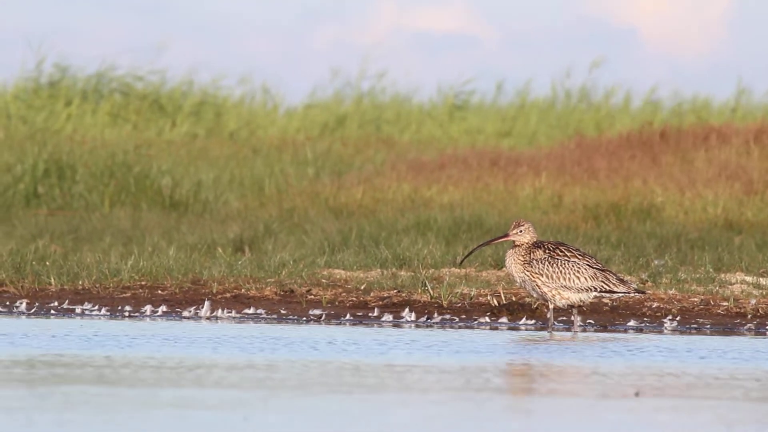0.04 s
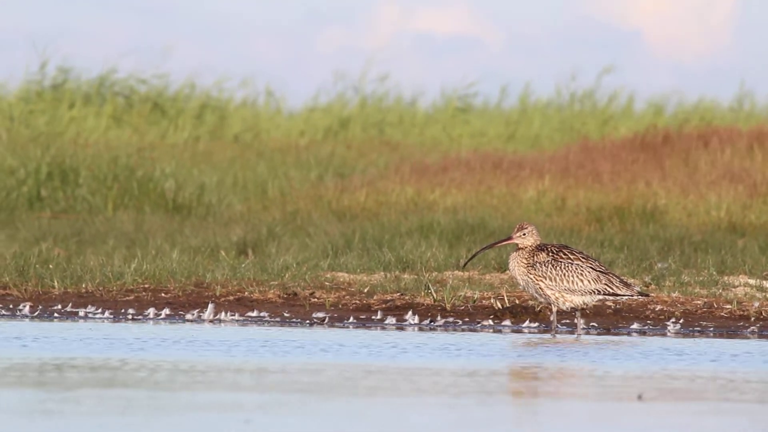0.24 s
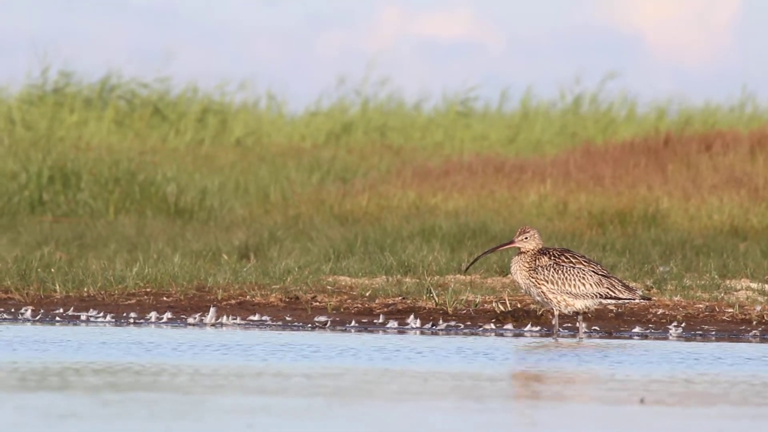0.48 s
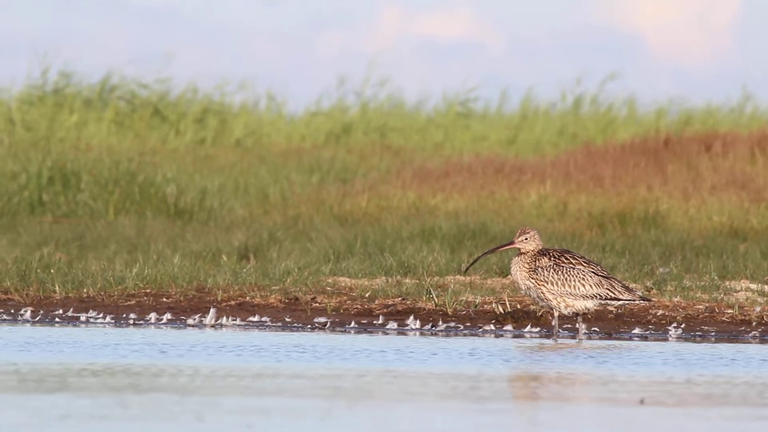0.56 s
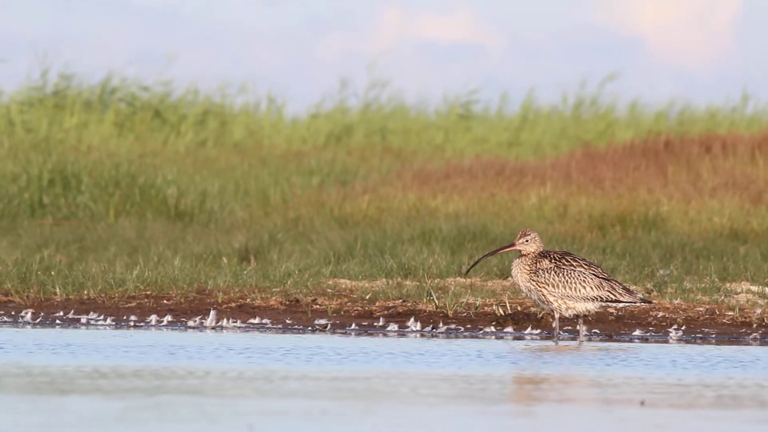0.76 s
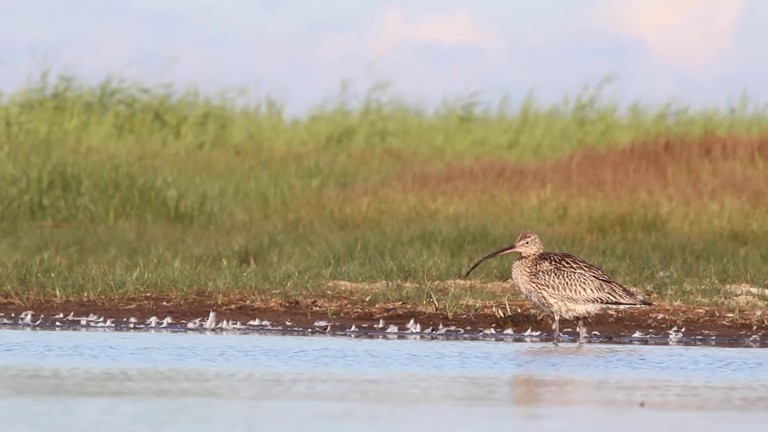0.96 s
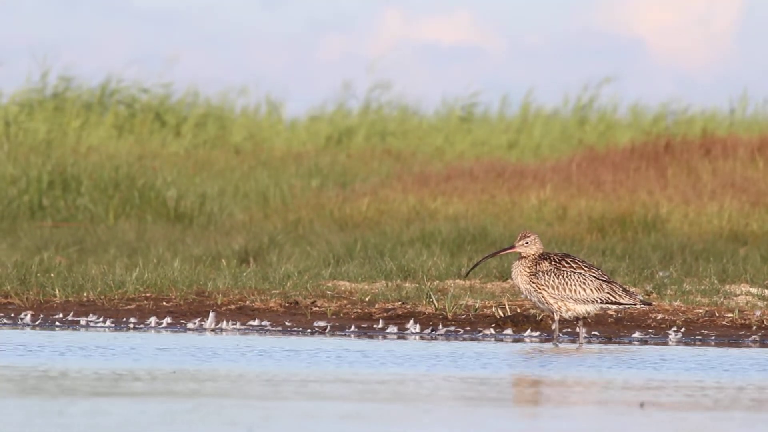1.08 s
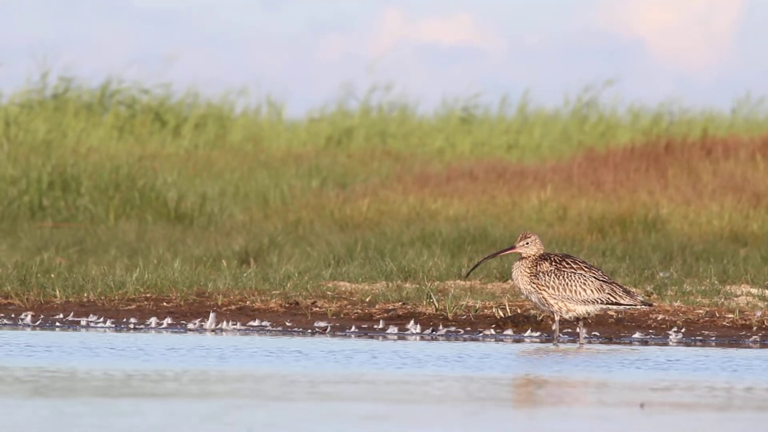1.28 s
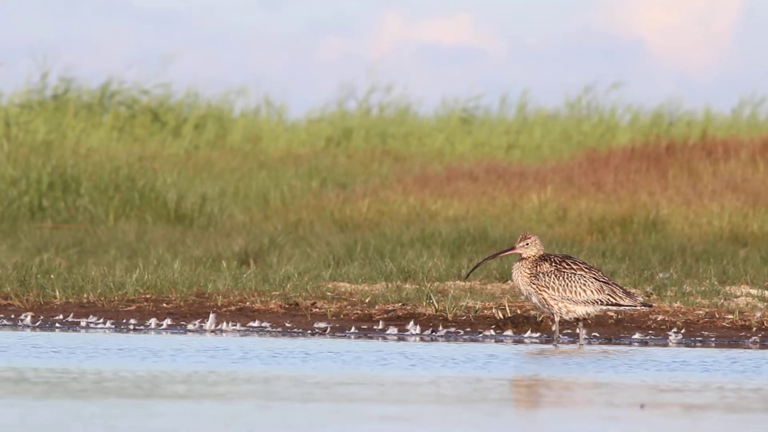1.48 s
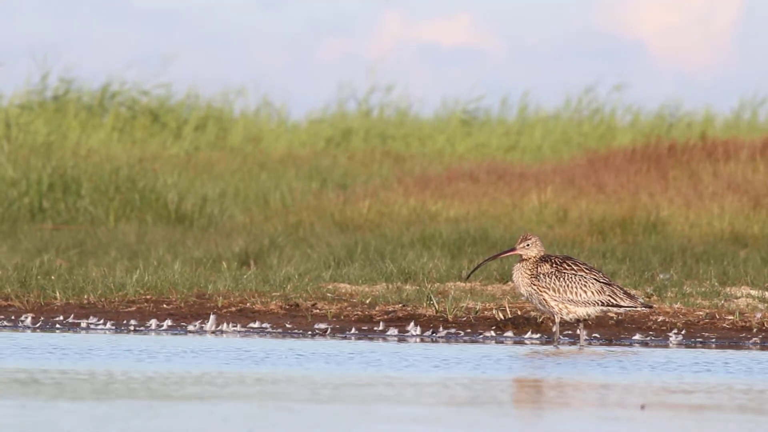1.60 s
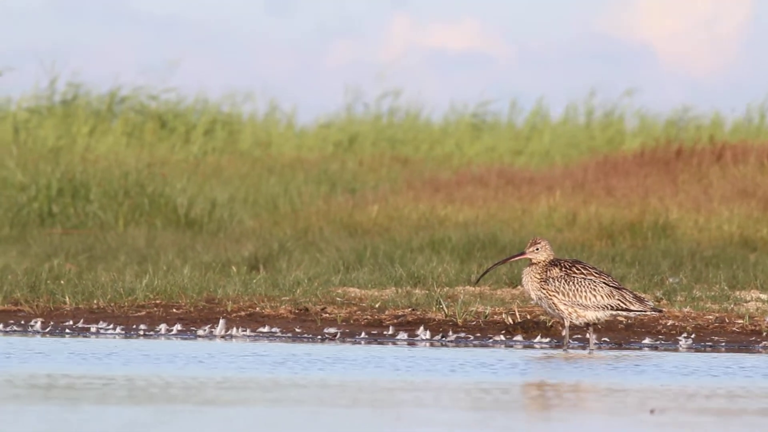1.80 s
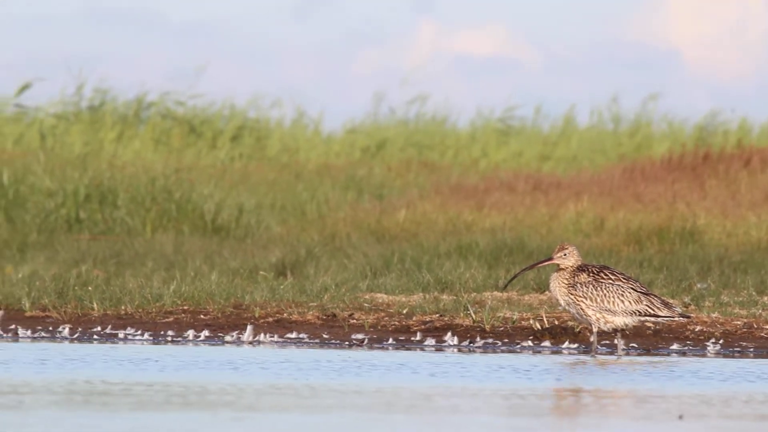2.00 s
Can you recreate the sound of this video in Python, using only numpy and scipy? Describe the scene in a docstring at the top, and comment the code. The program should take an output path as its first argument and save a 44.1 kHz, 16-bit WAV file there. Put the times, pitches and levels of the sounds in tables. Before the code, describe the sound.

A wading bird whistles outdoors, starting with the tail of a high, slightly rough note. A sharp camera click follows just before 0.1 seconds. At 0.9 seconds a clear whistle leaps up and slides down, followed by two short level pips at about 1.1 and 1.25. Low gusts bump the microphone throughout over a thin hiss. From 1.7 to 2 seconds come a soft rustle and faint handling ticks.

```python
"""A wading bird whistles on a marsh shore: the end of one note, then a falling note and two level pips.
Its voice is a nearly pure vibration, a little rough at times, shaped by its throat and bill.
Gusts bump the microphone over a low murmur of wind, a thin hiss and a soft rustle.
A handled camera gives one sharp snap, which briefly turns all the sound down, and later faint ticks."""
import sys
import numpy as np
from scipy import signal
from scipy.fft import rfft, irfft
from scipy.io import wavfile
from scipy.ndimage import uniform_filter1d

SR = 44100
rng = np.random.default_rng(int(sys.argv[2]) if len(sys.argv) > 2 else 0)


def output_pcm(signal):
    """Save a mono or channel-first signal as 16-bit PCM at the path in sys.argv[1].

    Samples are clipped to [-1, 1] before scaling.
    """
    pcm = np.clip(np.atleast_2d(signal).T, -1, 1) * 32767
    wavfile.write(sys.argv[1], SR, np.round(pcm).astype(np.int16))


N = 90404

# Short, level notes. Effort is the strength of the voice before the throat shapes it.
# start_s, length_s, pitch_hz, effort_db, roughness (0 to 1), flutter_db
PIP_NOTES = [(-.040, 0.07, 2366, -36.5, 0.42, -16), (1.085, 0.074, 2277, -32, .02, -22.5),
             (1.24, 0.071, 2348, -34, 0.3, -17)]
# Path of the falling note: time_s, pitch_hz, effort_db, overtone_boost_db
SLUR_PATH = [(.911, 1340, -53, 9), (0.913, 1426, -38, 13), (0.917, 1850, -39, 18.5),
             (0.9212, 2440, -39.5, 22), (0.9226, 3224, -30.5, 10.5), (.930, 3215, -25.5, 6.5),
             (0.935, 3145, -24.5, -2), (.948, 2550, -29.5, 6), (0.958, 2453, -29.5, 0),
             (.972, 2340, -31.5, -1), (1.000, 2290, -30, -5), (1.014, 2276, -33, -8), (1.02, 2210, -43, -5),
             (1.024, 1663, -34.5, -2), (1.037, 1400, -43, 1)]
# Strength of the voice's second and third harmonics: gain_db
HARMONIC_GAINS = [-15, -16.5]
# How the throat and bill favour some pitches: frequency_hz, gain_db
THROAT_SHAPE = [(800, -44), (1450, -14.5), (1700, -9), (2230, 0.5), (3200, -2), (3800, -10), (4500, -11),
                (5300, -15), (6400, -10.5), (6800, -24), (10000, -41)]
# Tone colour of the rasp in a rough note: frequency_hz, gain_db
RASP_SHAPE = [(1400, -23), (1650, -2), (2300, 0), (2650, -15), (3200, -11), (4200, -25), (7000, -37)]

# Gusts hitting the microphone: peak_s, half_width_s, level_db
WIND_GUSTS = [(.01, 0.031, -36.5), (0.461, 0.064, -46.5), (.70, 0.086, -43), (0.766, 0.022, -34.5),
              (0.882, 0.021, -40), (1.016, 0.016, -45.5), (1.12, 0.072, -51.5), (1.302, 0.012, -42),
              (1.469, .018, -32), (1.53, 0.029, -43), (1.602, 0.015, -37), (1.648, 0.013, -36.5),
              (1.757, 0.027, -36), (1.83, 0.044, -40.5), (1.98, 0.047, -43.5)]
# Deep rumble of a gust: frequency_hz, gain_db
RUMBLE_SHAPE = [(10, -8), (25, 1.5), (45, 1.5), (75, 1.5), (115, -1), (160, -11), (260, -28.5), (450, -44),
                (1000, -66), (3000, -90)]
# Higher rumble that strong gusts bring out: frequency_hz, gain_db
UPPER_RUMBLE_SHAPE = [(40, -30), (90, -23.5), (130, 2), (190, -0.5), (260, -9.5), (450, -23.5), (1000, -38),
                      (3000, -78)]
# Steady hiss of the air: frequency_hz, gain_db
HISS_SHAPE = [(100, -23), (250, -10.5), (420, -6), (480, -6), (580, -3), (700, -6.5), (850, -16),
              (1000, -17.5), (1500, -16), (2200, -20), (3900, -22), (9000, -30), (16000, -30.5)]
# Hollow tones in the wind's murmur: pitch_hz, width_hz, level_db
MURMUR_BANDS = [(335, 8.3, -67.5), (393, 20, -67), (586, 46, -56), (647, 17, -61.5)]
# How the rustle fades and swells: time_s, level_db
RUSTLE_LEVELS = [(0, -51), (.15, -62), (1.3, -72), (1.62, -77), (1.72, -39), (1.83, -48), (1.88, -49.5),
                 (1.95, -46), (2.05, -59.5)]
# Tone colour of the rustle: frequency_hz, gain_db
RUSTLE_SHAPE = [(100, 13), (220, 5.5), (400, 7.5), (700, 5.5), (1000, -14), (1600, -6.5), (2600, -12.5),
                (4000, -31), (9000, -30)]

# Tones the camera rings with when it snaps: pitch_hz, gain_db, fade_s (time to fall by 60 dB)
SNAP_TONES = [(560, -20.5, 0.012), (886, -10, 0.02), (1139, -18, 0.029), (1320, -26, 0.017),
              (1523, -9.5, 0.016), (1880, -8, 0.01), (2423, -7, 0.012), (2880, -21, 0.02),
              (3360, -13, 0.0049), (4180, -23.5, 0.017), (4660, -16, 0.009), (5930, -18, 0.0051),
              (7080, -21, 0.01), (8100, -20.5, 0.0058), (9370, -27.5, 0.0089), (11070, -12, 0.0035),
              (15500, -17.5, .004)]
# Rattle after the snap: frequency_hz, gain_db
RATTLE_SHAPE = [(100, -37), (500, -15), (900, -4), (2400, -10), (3500, -17), (5000, -25), (10000, -38),
                (16000, -40)]
# Faint ticks from handling the camera: start_s, gain_db
TICK_HITS = [(1.6734, -48.5), (1.7755, -50), (1.7965, -59), (1.832, -48.5), (1.844, -51), (1.948, -33)]
# Tones each tick rings with: pitch_hz, gain_db, fade_s (time to fall by 60 dB)
TICK_TONES = [(1222, -7, 0.084), (1500, 1, 0.017), (1750, 1, 0.025), (2250, 1.5, 0.015), (2670, -7, .012)]


def amp(db):
    """Turns decibels into a number to multiply by."""
    return 10 ** (np.asarray(db) / 20)


def unit(x):
    """Scales a signal to an average strength (rms) of 1."""
    return x / np.sqrt(np.mean(x ** 2) + 1e-20)


def gain_at(shape, hz):
    """Looks up a shape table at hz and gives a number to multiply by."""
    table_hz, db = np.transpose(shape)
    return amp(np.interp(np.log(hz + 1), np.log(table_hz + 1), db))


def filtered_noise(gain, size):
    """Noise of strength 1, with each frequency weighted by the function gain."""
    hz = np.fft.rfftfreq(size, 1 / SR)
    return unit(irfft(rfft(rng.standard_normal(size)) * gain(hz), size))


def noise(shape, size):
    """Noise with the tone colour of a shape table."""
    return filtered_noise(lambda hz: gain_at(shape, hz), size)


def wobble(size, rate_hz=248):
    """A random waver, mostly slower than rate_hz."""
    return filtered_noise(lambda hz: 1 / (1 + (hz / rate_hz) ** 4), size)


def add(mix, start_s, sound):
    """Mixes a sound in at start_s, dropping what falls outside the mix."""
    at = round(start_s * SR)
    sound = sound[max(-at, 0):]
    part = mix[max(at, 0):][:len(sound)]
    part += sound[:len(part)]


def whistle(hz, effort_db, bright_db, rough, flutter_db):
    """The bird's voice: a nearly pure vibration with some rasp, shaped by the throat and bill."""
    flutter_hz, catches_per_s, catch_s = 745, 380 * rough, 0.0016
    size = len(hz)
    t = np.arange(size) / SR
    phase = 2 * np.pi * np.cumsum(hz * (1 + 0.03 * rough * wobble(size))) / SR
    # A second, slower vibration adds a tone on each side of the pitch.
    flutter = 2 * np.pi * np.cumsum(flutter_hz * (1 + 0.02 * wobble(size))) / SR
    side_tones = amp(flutter_db) * (np.sin(phase - flutter) + 0.72 * np.sin(phase + flutter))
    # Each brief catch in the voice dips the tone and spits a puff of rasp.
    catch_times = t[rng.random(size) < catches_per_s / SR]
    catches = sum(np.exp(-((t - s) / catch_s) ** 2) for s in catch_times)
    tone = np.sin(phase) * (1 + 0.5 * rough * wobble(size)) * np.exp(-1.2 * catches)
    rasp = rough * (0.42 + 1.4 * catches) * noise(RASP_SHAPE, size)
    overtones = sum(amp(db + bright_db) * gain_at(THROAT_SHAPE, k * hz) * np.sin(k * phase)
                    for k, db in enumerate(HARMONIC_GAINS, 2))
    voice = gain_at(THROAT_SHAPE, hz) * (tone + side_tones + rasp) + overtones
    fade = np.minimum(np.minimum(t, t[::-1]) / 0.0012, 1)
    return fade * amp(effort_db) * voice


def bird_pips():
    """Each pip jumps from a weak, low, buzzy voice up to its pitch, swells, fades and drops back."""
    low_hz, arch_hz, jump_s, edge_s = 1572, 35, 0.006, 0.014
    peak = 0.62  # how far through the held note the effort and pitch are highest
    out = np.zeros(N)
    for start_s, length_s, pitch_hz, effort_db, roughness, flutter_db in PIP_NOTES:
        t = np.arange(-edge_s, length_s + edge_s, 1 / SR)
        outside_s = np.maximum(np.maximum(-t, t - length_s), 0)
        progress = np.clip(t / length_s, 0, 1)
        low_voice = 1 - 1 / (1 + (outside_s / jump_s) ** 6)  # 0 while held, near 1 at both ends
        held_hz = pitch_hz - arch_hz * ((progress - peak) / peak) ** 2
        hz = held_hz + (low_hz - held_hz) * low_voice
        from_peak = np.maximum((peak - progress) / peak, (progress - peak) / (1 - peak))
        swell_db = -4.5 * from_peak ** 3
        edge_db = -8.5 * (1 - np.exp(-outside_s / 0.004)) + 7 * low_voice
        bright_db = -6 + 8 * low_voice
        rough = roughness * np.exp(-0.39 * progress)  # the voice gets clearer as it is held
        note = whistle(hz, effort_db + swell_db + edge_db, bright_db, rough, flutter_db)
        add(out, start_s - edge_s, note)
    return out


def gusts():
    """Wind bumps the microphone: a deep rumble that swells with each gust, brighter in strong ones."""
    lull_db, strong_db = -55.5, -35
    t = np.arange(N) / SR
    power = sum(amp(db) ** 2 * np.exp(-((t - s) / width) ** 2) for s, width, db in WIND_GUSTS)
    strength = np.sqrt(amp(lull_db) ** 2 + power)
    upper_strength = amp(-40) * (strength / amp(strong_db)) ** 1.57
    return strength * noise(RUMBLE_SHAPE, N) + upper_strength * noise(UPPER_RUMBLE_SHAPE, N)


def murmur():
    """The wind's low, hollow murmur: a few narrow bands of noise."""
    return sum(amp(db) * filtered_noise(lambda hz: 1 / (1 + (2 * (hz - pitch_hz) / width_hz) ** 2), N)
               for pitch_hz, width_hz, db in MURMUR_BANDS)


def rustle():
    """Soft noise that dies away at the start and comes back near the end."""
    level_db = np.interp(np.arange(N) / SR, *np.transpose(RUSTLE_LEVELS))
    return amp(level_db) * noise(RUSTLE_SHAPE, N)


def hiss(level_db=-50.5):
    """The thin, steady hiss of the air."""
    return amp(level_db) * noise(HISS_SHAPE, N)


def ring(tones, rise_cycles):
    """A knocked part rings with dying tones; high ones start faster, and every other one is flipped."""
    t = np.arange(SR // 8) / SR
    out = np.zeros(len(t))
    for k, (hz, db, fade_s) in enumerate(tones):
        rise = 1 - np.exp(-t * hz / rise_cycles)
        out += (-1) ** k * rise * amp(db - 60 * t / fade_s) * np.sin(2 * np.pi * hz * t)
    return out


def camera_snap():
    """A camera part snaps with a crack, rings and rattles, and bounces once, softer and duller."""
    start_s, bounce_delay_s = 0.0608, 0.00208
    crack_fade_s, rattle_fade_s = 0.0032, 0.054
    body = amp(1.5) * ring(SNAP_TONES, rise_cycles=0.44)
    t = np.arange(len(body)) / SR
    crack = amp(-20 - 60 * t / crack_fade_s) * rng.standard_normal(len(t))
    rattle = amp(-22 - 60 * t / rattle_fade_s) * noise(RATTLE_SHAPE, len(t))
    bounce = amp(-6) * signal.lfilter(*signal.butter(1, 2560, fs=SR), body)  # duller above 2560 Hz
    out = np.zeros(N)
    add(out, start_s, body + crack + rattle)
    add(out, start_s + bounce_delay_s, bounce)
    return out


def bird_slur():
    """The bird's whistle leaps up, then slides down in pitch."""
    times, *columns = np.transpose(SLUR_PATH)
    t = np.arange(times[0], times[-1], 1 / SR)
    hz, effort_db, bright_db = [np.interp(t, times, column) for column in columns]
    smooth_hz = uniform_filter1d(hz, size=90)
    out = np.zeros(N)
    add(out, times[0], whistle(smooth_hz, effort_db, bright_db, rough=0.008, flutter_db=-46))
    return out


def camera_ticks():
    """Light knocks from handling make the camera ring faintly."""
    out = np.zeros(N)
    for start_s, gain_db in TICK_HITS:
        add(out, start_s, amp(gain_db) * ring(TICK_TONES, rise_cycles=1.0))
    return out


def scene():
    """Bird, camera, wind and background, mixed into one channel."""
    bird = bird_slur() + bird_pips()
    camera = camera_snap() + camera_ticks()
    return (bird + camera + gusts() + murmur() + rustle() + hiss())[None]


def record(dry):
    """An automatic volume control dips after a loud sound and recovers; the highest treble is cut."""
    threshold_db, dip_share, smooth_s, cutoff_hz = -28, 0.27, 0.014, 16000
    lag = np.exp(-1 / (smooth_s * SR))
    smoother = [1 - lag], [1, -lag]
    level_db = 10 * np.log10(signal.lfilter(*smoother, dry[0] ** 2) + 1e-12)
    # Remember each peak, letting it sink by 79 dB a second.
    sink_db = np.arange(N) * 79 / SR
    peak_db = np.maximum.accumulate(level_db + sink_db) - sink_db
    excess_db = np.maximum(peak_db - threshold_db, 0)
    dipped = dry * amp(-dip_share * signal.lfilter(*smoother, excess_db))
    treble_cut = signal.firwin(255, cutoff_hz, window=("kaiser", 8), fs=SR)
    return signal.oaconvolve(dipped, treble_cut[None], "same")


dry = scene()
out = record(dry)
output_pcm(out)
```